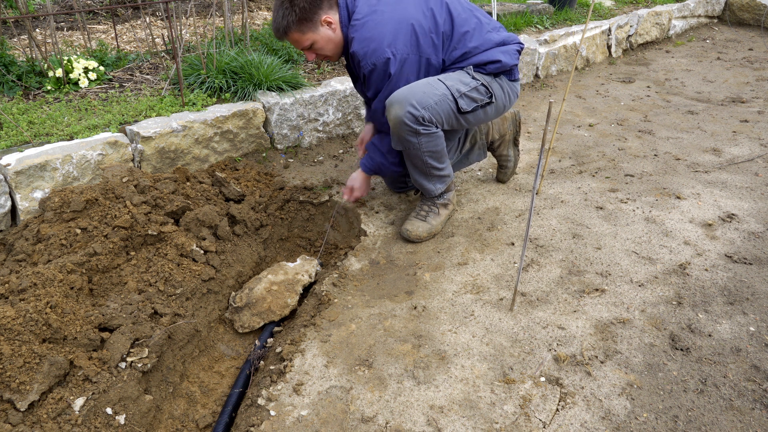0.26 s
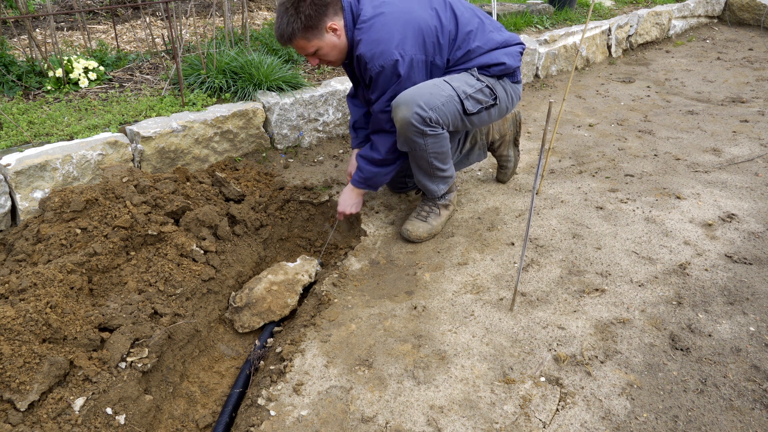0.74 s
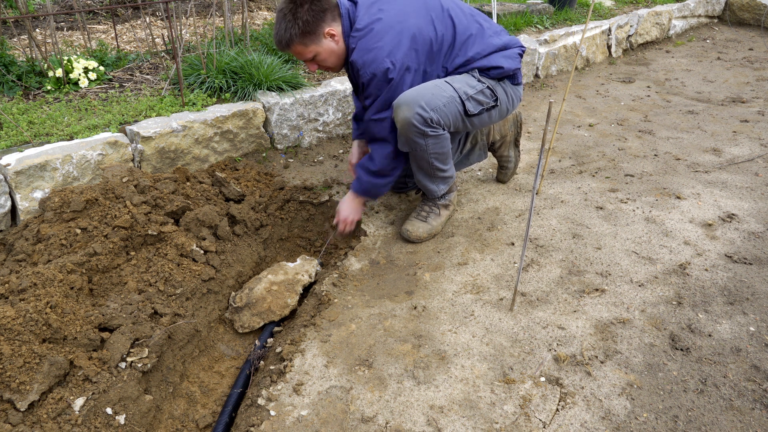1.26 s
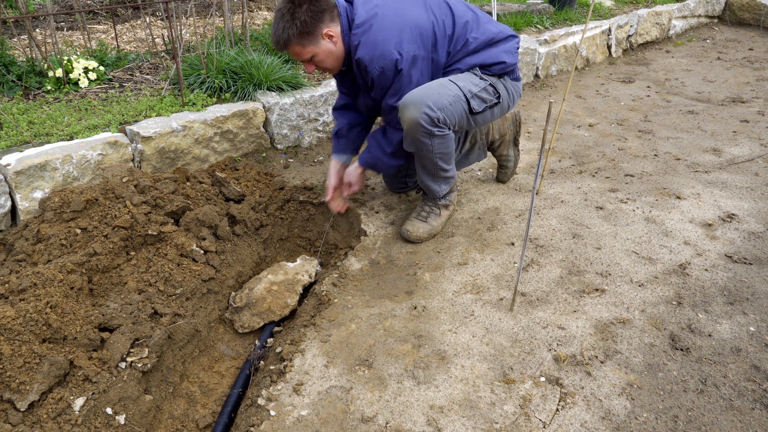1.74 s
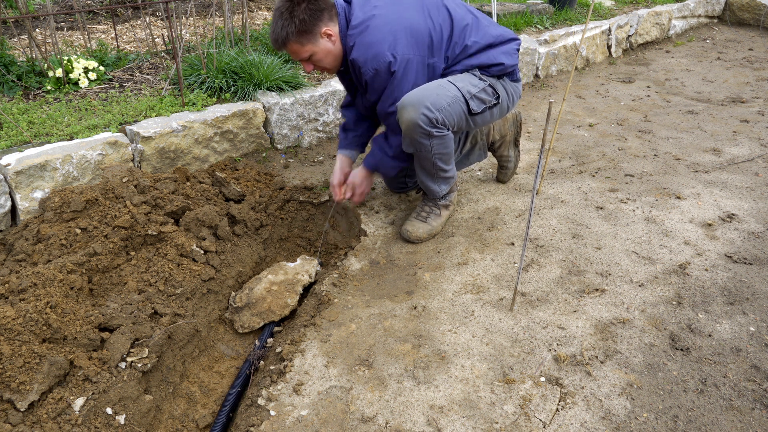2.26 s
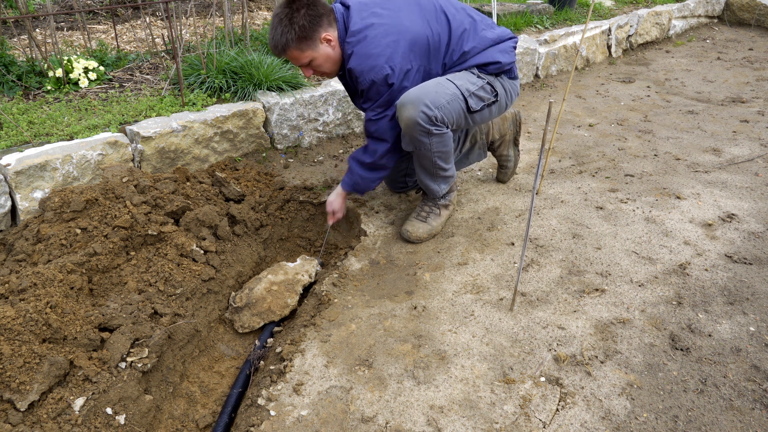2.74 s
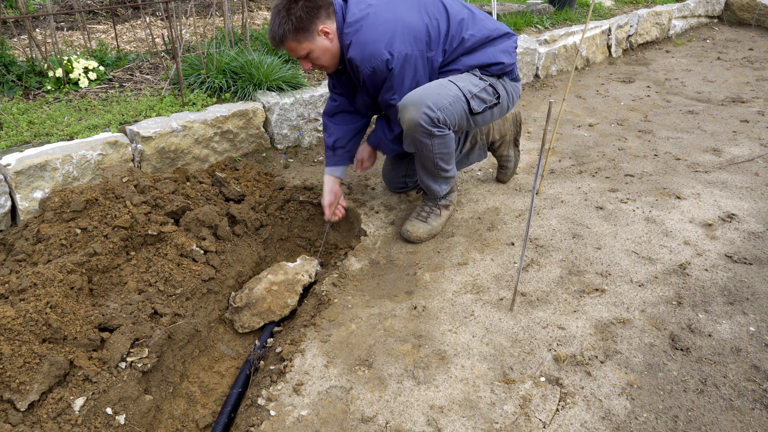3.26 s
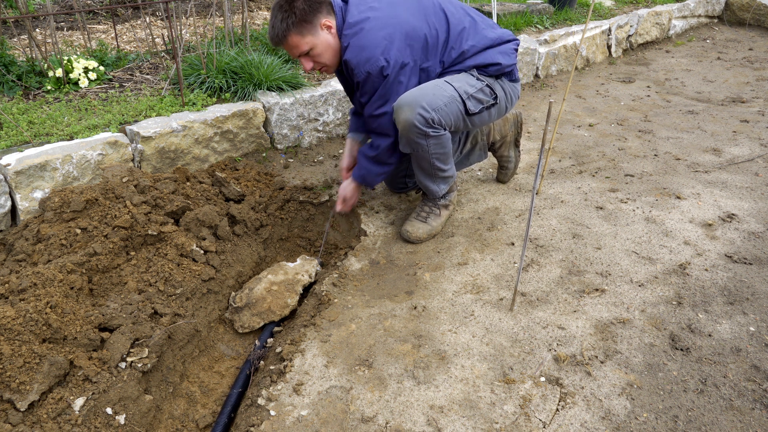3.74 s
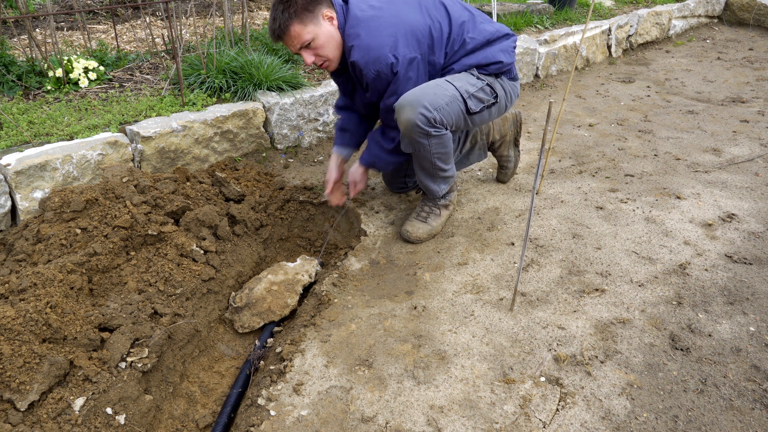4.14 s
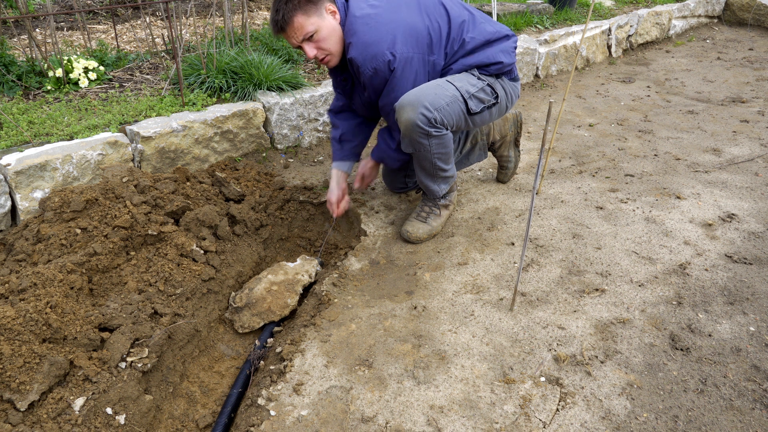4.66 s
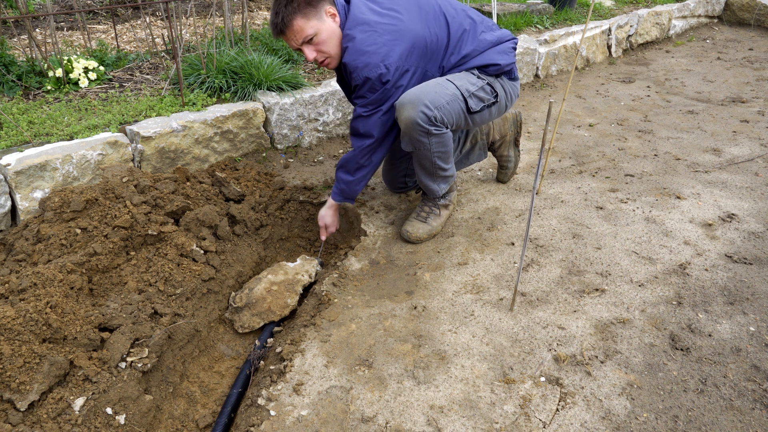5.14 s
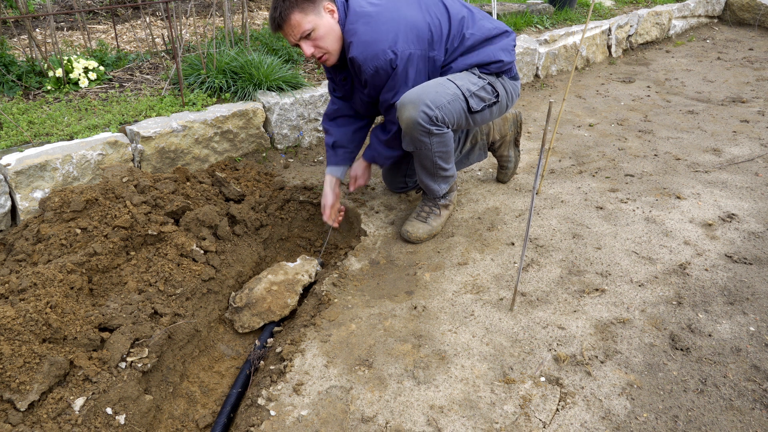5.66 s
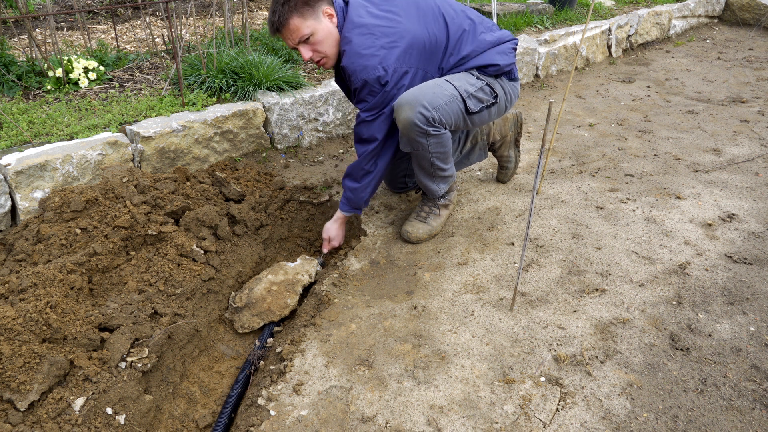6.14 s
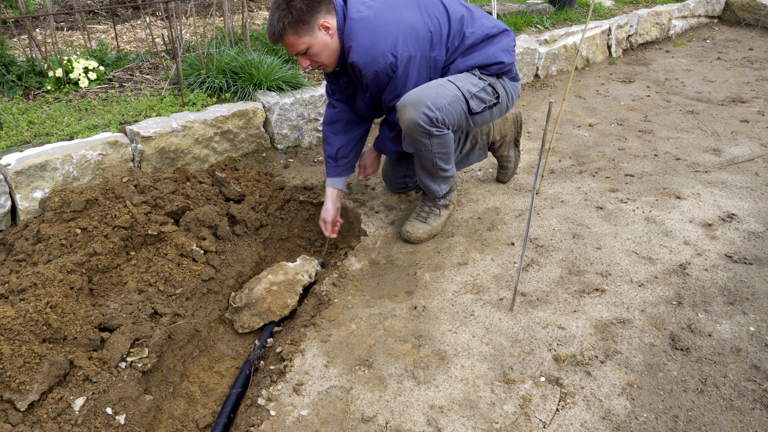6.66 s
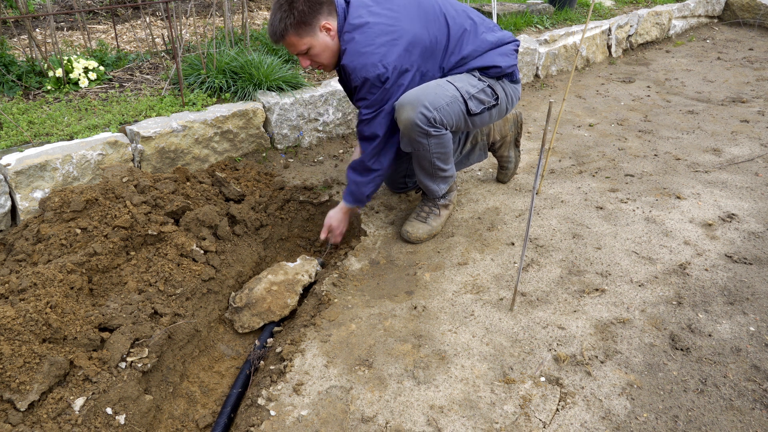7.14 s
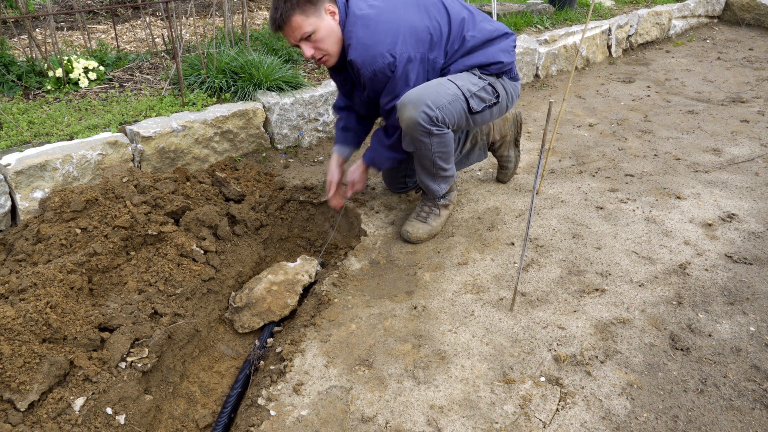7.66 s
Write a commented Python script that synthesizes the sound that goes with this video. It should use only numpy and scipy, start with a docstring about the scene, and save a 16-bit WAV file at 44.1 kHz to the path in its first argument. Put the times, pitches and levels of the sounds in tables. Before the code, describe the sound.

Dry, close outdoor sound of a stiff wire being pushed by hand into a ribbed plastic pipe in the ground. A faint scrape and tick open it; at 0.2 s a buzzing stroke swells to about 0.55 s. A very quiet nylon sleeve zip rises and falls around 0.6 s over a near pause. From 0.86 s strokes return, clicking regularly over ribs, the one to 1.65 s growing louder. By 2.3 s more of the wire rubs and the buzz becomes a dense, hollow rasp. Strokes then follow roughly every 0.4 s, swelling and dropping, with brief harder catches. Dull slaps knock the pipe near 2.7, 3.9, 4.1, 5.3, 7.6 and 7.8 s; sharp clicks at 0.3, 0.9, 4.9 and 7.1 s. A short lull comes near 6.2 s, then strong strokes peak near 6.9 and 7.35 s, and the last ends around 7.9 s. Low wind buffeting is mostly between 0.8 and 4 s, over faint garden air.

```python
"""A buzzing scrape comes in strokes: a stiff wire is fed by hand into a ribbed plastic pipe buried in a garden.
Its tip clicks over the ribs; within 2.34 s more bends rub the wall too and the buzz thickens to a rasp.
Filtered noise bursts knock on the pipe, filtered clicks snap off the ribs, and a nylon sleeve zips once
as a pair of gliding tones. Shaped noise makes the light wind on the microphone and the faint garden air."""
import sys
import numpy as np
from scipy import signal
from scipy.fft import rfft, irfft, next_fast_len
from scipy.io import wavfile
from scipy.ndimage import uniform_filter1d, map_coordinates

SR = 44100
rng = np.random.default_rng(int(sys.argv[2]) if len(sys.argv) > 2 else 0)


def generate_wav(signal):
    """Clip the signal to [-1, 1] and save it as 16-bit WAV at the path in sys.argv[1]."""
    frames = np.transpose(np.atleast_2d(signal))
    scaled = np.clip(frames, -1, 1) * 32767
    pcm = np.round(scaled).astype(np.int16)
    wavfile.write(sys.argv[1], SR, pcm)


N = 347949
TIME = np.arange(N) / SR
SIZE = 2 * next_fast_len(N // 2 + 8192)  # transform length, with room for filter tails
HZ = np.maximum(np.arange(SIZE // 2 + 1) * SR / SIZE, 1)

# colour of a rib contact: pitch_hz, relative density_db (per Hz)
CONTACT = [(120, -33.5), (220, -29), (320, -17), (400, -16.5), (500, -9), (700, -7.5), (950, -4.5),
           (1700, -6.5), (2250, -9), (3200, -3.5), (6300, -14.5), (8800, -17.5), (10800, -24.5),
           (15800, -31)]
# resonances of the pipe's bore and wall: pitch_hz, width_hz, lift_db
PIPE = [(1420, 470, 5), (2728, 434, 9.5), (4820, 2400, 5), (7690, 2100, 11), (13440, 3100, 12)]


def from_db(db):
    """Decibels to gain."""
    return 10 ** (np.asarray(db) / 20)


def rms_one(x):
    """Scale to unit power."""
    return x / np.sqrt(np.mean(x ** 2) + 1e-20)


def in_time(rows):
    """Join each column of a table with straight lines over its times."""
    times, *columns = np.transpose(rows)
    return [np.interp(TIME, times, column) for column in columns]


def slope_db(points):
    """A spectrum joined on a log-frequency axis."""
    hz, db = np.transpose(points)
    return np.interp(np.log(HZ), np.log(hz), db)


def bells_db(peaks):
    """Summed lift of a set of resonances; a negative lift is a dip."""
    return sum(db / (1 + (2 * (HZ - hz) / width) ** 2) for hz, width, db in peaks)


def colour(x, curve_db):
    """Causal, minimum-phase filter with the given response, built by folding its cepstrum."""
    cepstrum = irfft(np.log(from_db(curve_db)))
    cepstrum[1:SIZE // 2] *= 2
    cepstrum[SIZE // 2 + 1:] = 0
    response = np.exp(rfft(cepstrum))
    return irfft(rfft(x, SIZE) * response)[:N]


def split(x, edge_hz):
    """The parts below and above a frequency; they add up to the whole."""
    lowpass = signal.butter(4, edge_hz, fs=SR, output="sos")
    low = signal.sosfiltfilt(lowpass, x)
    return low, x - low


def drift(rate):
    """Random wander with spread 1: `rate` chance values a second, joined by straight lines."""
    knots = rng.standard_normal(4096)
    return rms_one(map_coordinates(knots, [TIME * rate], order=1, mode="wrap"))


def even(x):
    """Hold the slow level near 1 and keep the grain."""
    power = uniform_filter1d(uniform_filter1d(x ** 2, size=1600), size=1600)
    return x / np.sqrt(np.maximum(power, 1e-12))


def burst(t60):
    """A dense cluster of reflections, 60 dB down after t60 seconds, with unit energy."""
    t = np.arange(4096) / SR
    tail = rng.standard_normal(len(t)) * from_db(-60 * t / t60)
    return tail / np.sqrt(np.sum(tail ** 2))


def through_pipe(clicks, echo_db, t60):
    """Each click is followed by its reflections in the bore."""
    return clicks + from_db(echo_db) * signal.oaconvolve(clicks, burst(t60))[:N]


def resonate(x, hz, width_hz):
    """What one two-pole resonance passes, with gain about 1 at its top."""
    r = np.exp(-np.pi * width_hz / SR)
    feed = np.array([1, 0, -1]) * (1 - r * r) / 2
    feedback = [1, -2 * r * np.cos(2 * np.pi * hz / SR), r * r]
    return signal.lfilter(feed, feedback, x)


def scrape():
    """Tip and bends skip over the ribs, ring the pipe, and follow the push of the hand."""
    # with the tip near the mouth the gaps between resonances are deeper: pitch_hz, width_hz, lift_db
    near_mouth = [(2200, 2600, -4.5), (3530, 860, -4), (6470, 830, -8.5), (10500, 1900, -8),
                  (8460, 1000, 2.5)]
    level_db, weight_db, bite_db = hand()
    depth = np.clip(TIME / 2.34, 0, 1)  # share of the bends that already touch the wall
    ribs_per_s = 245 * from_db(.42 * np.clip(level_db + 23, -25, 3))  # faster is louder
    contact = rib_contact(ribs_per_s, level_db, depth)

    deep = colour(contact, slope_db(CONTACT) + bells_db(PIPE))
    shallow = colour(deep, bells_db(near_mouth))
    pipe = shallow + depth ** 2 * (deep - shallow)
    pipe = wandering_bore(free_spans(wire_modes(pipe)))

    wall, rest = split(pipe, 800)
    rasp, edge = split(rest, 2200)
    body = from_db(weight_db) * even(wall) + even(rasp)
    edge = from_db(bite_db) * even(flickering_treble(edge))
    # the wire whips in the bore, so the pressure flutters
    pressure_db = 0.73 * drift(55)
    return from_db(level_db + pressure_db) * (body + edge)


def rib_contact(ribs_per_s, level_db, depth):
    """The tip's regular clicks give way to the looser clicks of five bends, over rubbing noise."""
    creep_db = np.clip(level_db + 26.5, -12, 0)  # a creeping tip stays in touch and hardly skips
    tip_clicks = rib_clicks(ribs_per_s, jitter=.06, uneven_db=2.0)
    tip = even(through_pipe(tip_clicks, echo_db=-2.5, t60=0.012))
    bends = np.zeros(N)
    for _ in range(5):
        bend_clicks = rib_clicks(ribs_per_s * rng.uniform(.7, 1.2), jitter=.35, uneven_db=2.0)
        bends += through_pipe(bend_clicks, echo_db=2.5, t60=0.028)
    friction = rng.standard_normal(N) * from_db(2.9 * drift(260))
    tip_gain = from_db(creep_db - 9.0 * depth)
    bends_gain = from_db(-7 * (1 - depth))
    return tip_gain * tip + bends_gain * even(bends) + from_db(-3.5) * friction


def rib_clicks(per_s, jitter, uneven_db):
    """One click of uneven strength for each rib that a point of the wire passes."""
    speed = per_s * np.exp(jitter * drift(120))
    ribs_passed = np.floor(np.cumsum(speed) / SR + rng.random())
    strength_db = uneven_db * np.clip(rng.standard_normal(N), -2.2, 2.2)
    return np.diff(ribs_passed, prepend=ribs_passed[0]) * from_db(strength_db)


def wire_modes(x, relative_width=0.14, bore_hz=2800, bore_width_hz=440):
    """Through each push two bending modes of the wire are lifted or dipped, and so is the bore's ring."""
    # each new grip leaves the wire bent differently:
    # start_s, low_mode_hz, low_lift_db, high_mode_hz, high_lift_db, bore_lift_db
    grips = [(0, 1430, 7, 3080, 11, -2), (.19, 1160, 1.5, 2190, 6.5, 0), (.55, 1180, 0, 2380, 4, -5),
             (.85, 1068, 5.5, 4900, -2, -5), (1.18, 1386, 6.5, 3350, 2, 0.5),
             (1.65, 2026, 1.5, 3493, 4, 1.5), (2.08, 2041, 2, 3950, 6.5, 2), (2.49, 596.4, 6.5, 2069, 2, 2),
             (2.88, 2027, 1.5, 3870, 4.5, -0.5), (3.26, 1816, 5, 4025, 2.5, -2),
             (3.64, 589, 0, 3868, 2.5, 3), (4.03, 655.5, -1, 1970, 2, -2),
             (4.44, 591.2, 4, 1948, -0.5, -1.5), (4.82, 871, 3.5, 1082, 4.5, -0.5),
             (5.23, 580.3, 3, 3110, -3.5, 3.5), (5.63, 728, -3, 3059, -1.5, 2.5),
             (6.21, 918.6, -0.5, 3200, 1, -2.5), (6.68, 714, 2.5, 1099, 3.5, 0),
             (7.1, 1180, 4.5, 5127, 2.5, 0.5), (7.55, 650.4, 0, 4994, 2.5, -1.5)]
    out = x.copy()
    starts = [max(round(row[0] * SR), 0) for row in grips]
    ends = starts[1:] + [N]
    for start, end, (_, low_hz, low_db, high_hz, high_db, bore_db) in zip(starts, ends, grips):
        modes = ((low_hz, relative_width * low_hz, low_db),
                 (high_hz, relative_width * high_hz, high_db),
                 (bore_hz, bore_width_hz, bore_db))
        for hz, width_hz, lift_db in modes:
            out[start:end] += (from_db(lift_db) - 1) * resonate(x[start:end], hz, width_hz)
    return out


def free_spans(x, swing_db=3.5, rate=14, relative_width=0.023, count=30):
    """Spans of wire between contacts keep changing length, so narrow rings come and go."""
    out = x.copy()
    for hz in np.geomspace(450, 3400, count):
        lift_db = swing_db * (np.clip(drift(rate), -2, 2) - 0.14)
        out += (from_db(lift_db) - 1) * resonate(x, hz, relative_width * hz)
    return out


def wandering_bore(x, low_hz=2670, high_hz=2990, width_hz=260, swing_db=2.0):
    """As the contacts travel they favour one side of the bore's ring, then the other."""
    lean_db = swing_db * drift(28)
    low_side = (from_db(lean_db) - 1) * resonate(x, low_hz, width_hz)
    high_side = (from_db(-lean_db) - 1) * resonate(x, high_hz, width_hz)
    return x + low_side + high_side


def flickering_treble(edge):
    """Three bands of the treble flicker in level independently."""
    ring, top = split(edge, 3250)
    hiss, sizzle = split(top, 9500)
    top = hiss * from_db(1.0 * drift(22)) + sizzle * from_db(1.2 * drift(45))
    return ring * from_db(1.3 * drift(75)) + top


def hand():
    """Pushes swell and stop over a steady creep of the wire; gives level, wall weight and edge bite in dB."""
    # one push each, levels before trims and unsteadiness: start_s, end_s, attack_s, release_s, crest_db,
    # crest_s, sag_db_per_s (either side of the crest), creep_db, weight_db (wall), bite_db (edge)
    pushes = [(-0.0, 0.178, 0.0098, 0.038, -35, 0.24, 22, -50, -10.5, -0.5),
              (0.195, 0.547, 0.09, 0.084, -22.5, 0.28, 30, -52, -9.5, -3.5),
              (0.566, 0.834, 0.03, 0.19, -41.0, 0.58, 56, -50, -11.5, -5.1),
              (0.86, 1.168, 0.098, 0.062, -25.5, 0.96, 36, -67, -14.5, -3.9),
              (1.184, 1.658, 0.033, 0.071, -22.5, 1.5, 20, -37, -12.5, -3.5),
              (1.681, 2.093, 0.065, 0.13, -26.5, 1.94, 0, -37, -14, 1.3),
              (2.101, 2.492, 0.041, 0.057, -23.5, 2.23, 13, -44, -12.5, 1),
              (2.495, 2.882, 0.063, 0.049, -22, 2.68, 21, -32, -12.5, 0),
              (2.882, 3.267, 0.053, 0.083, -24, 3.07, 10, -38, -12, 2.5),
              (3.28, 3.643, 0.041, 0.088, -26.5, 3.42, 2, -42, -11.5, 4),
              (3.655, 4.036, 0.049, 0.044, -25.0, 3.91, 11, -46, -13.5, 3.5),
              (4.016, 4.432, 0.11, 0.08, -21.5, 4.2, 33, -35, -12.5, 2.7),
              (4.476, 4.83, 0.031, 0.065, -24, 4.62, 17, -49, -14.5, 1.5),
              (4.807, 5.237, 0.109, 0.055, -23.5, 5.06, 12, -43, -9.5, 0.2),
              (5.219, 5.654, 0.06, 0.076, -25, 5.38, 9, -36, -9.2, 1.5),
              (5.642, 6.16, 0.027, 0.17, -23.5, 5.78, 34, -40, -11, 3),
              (6.264, 6.679, 0.084, 0.063, -26.5, 6.43, 8, -47, -13.5, 2.1),
              (6.68, 7.101, 0.1, 0.053, -21, 6.91, 34, -31, -14, 2.5),
              (7.108, 7.521, 0.038, 0.18, -21.5, 7.35, 23, -51, -12.8, -0.2),
              (7.572, 7.923, 0.071, 0.051, -24.5, 7.71, 20, -35, -13, 2.5)]
    rasp_trim_db, wall_trim_db, edge_trim_db = -.5, -.5, -.5
    weight_per_db, bite_per_db = -0.47, 0.29  # away from the crest the sound is duller: dB per dB of level

    _, ends, _, _, crest_db, crest_s, _, creep_db, weight_db, bite_db = np.transpose(pushes)
    creep_changes_s = (ends[:-1] + ends[1:]) / 2
    power = from_db(creep_db[np.searchsorted(creep_changes_s, TIME)]) ** 2
    for start, end, attack, release, db, crest, sag, *_ in pushes:
        during = slice(*np.searchsorted(TIME, [start, end]))
        t = TIME[during]
        speed = np.clip(np.minimum((t - start) / attack, (end - t) / release), 0, 1)
        power[during] += (speed * from_db(db - sag * np.abs(t - crest))) ** 2
    push_db = 10 * np.log10(power) + stick_slip()
    from_crest_db = push_db - np.interp(TIME, crest_s, crest_db)

    catch_db, catch_weight_db = binding()
    tremor_db = 0.5651 * drift(25)
    effort_db = 0.57 * drift(12)  # slow unevenness of the arm
    wall_flutter_db = 1.74 * drift(46)
    level = push_db + rasp_trim_db + catch_db + tremor_db + effort_db
    weight = np.interp(TIME, crest_s, weight_db) + wall_trim_db + weight_per_db * from_crest_db
    weight = weight + catch_weight_db + wall_flutter_db
    bite = np.interp(TIME, crest_s, bite_db) + edge_trim_db + bite_per_db * from_crest_db
    return level, weight, bite


def stick_slip(surge_s=.018):
    """Sticking pulls the level down until the wire jerks free and overshoots; in dB."""
    # the jerks: jerk_s, dip_db before it, stick_s (growth time of the dip), surge_db after it
    jerks = [(.211, 4, .015, 5), (.929, 5, 0.024, 3), (1.207, 7, .012, 1), (1.746, 5, .02, 2.5),
             (2.121, 5, .015, 2), (2.516, 5, .012, 3), (4.836, 3, .012, 2), (5.257, 3, .015, 1.5),
             (6.238, 8, .05, .5)]
    change_db = np.zeros(N)
    for s, dip_db, stick_s, surge_db in jerks:
        distance_s = np.abs(TIME - s)
        sticking = -dip_db * np.exp(-distance_s / stick_s)
        surge = surge_db * np.exp(-distance_s / surge_s)
        change_db += np.where(TIME < s, sticking, surge)
    return change_db


def binding():
    """The wire binds for a moment and rasps harder: brief bumps in level and in wall weight, both in dB."""
    # the catches: centre_s, length_s, lift_db, added_weight_db
    catches = [(1.4, .02, 3, -1), (1.491, 0.039, 3, 2), (2.19, .04, 1, 3), (2.69, 0.031, 2, -3),
               (2.79, 0.042, 3, -4), (3.94, 0.024, 6, -2), (4.71, 0.059, .5, 7), (5.088, .025, 3.5, -3),
               (5.191, 0.042, .5, 5), (5.464, 0.019, 3, -5), (6.401, .04, 1, 6), (6.458, .03, 3, -1),
               (6.576, 0.041, 2.5, -4), (6.869, 0.061, 2, 2), (7.345, 0.046, 2.5, 1), (7.467, .02, 5, 2)]
    s, length, lift_db, weight_db = np.transpose(catches)
    bumps = np.exp(-(2 * (TIME[:, None] - s) / length) ** 2)
    return bumps @ lift_db, bumps @ weight_db


def knocks(level_db=21, ring_db=18):
    """The wire slaps the wall and chatters briefly; hard slaps also ring the upper resonances."""
    # wire slapping the wall: start_s, strength_db (relative), hardness_db (ring against slap)
    slaps = [(0.841, -14, -20), (0.928, -14, -19), (1.746, -12, -8.5), (2.122, -21, 4), (2.516, -18, -10),
             (2.674, -7, -15), (3.938, -2, -21), (4.074, -6, -14), (5.258, -6, -10), (5.38, -6, -14),
             (6.046, -11, -23), (6.196, -21, -32), (7.584, -3.5, -17), (7.617, -12, -4), (7.799, -3.5, -13)]
    # colour of a slap: pitch_hz, relative density_db (per Hz)
    slap_colour = [(150, -33), (350, -11), (600, -6), (1000, 4), (1450, -1.5), (2100, -22), (4000, -36),
                   (12000, -54)]
    dull, hard = np.zeros((2, N + 4096))
    for s, db, hard_db in slaps:
        hit = .85 * burst(.022)
        hit[0] += .5  # the first touch, before the chatter
        at = round(s * SR)
        dull[at:at + len(hit)] += hit * from_db(db)
        hard[at:at + len(hit)] += hit * from_db(db + hard_db)
    pipe = colour(hard[:N], slope_db(CONTACT) + bells_db(PIPE))
    _, ring = split(pipe, 2100)
    return from_db(level_db) * colour(dull[:N], slope_db(slap_colour)) + from_db(ring_db) * ring


def ticks():
    """The wire snaps off a rib: single sharp clicks with reflections, brighter than the sliding contacts."""
    # the snaps: start_s, strength_db (relative)
    snaps = [(0.061, -13), (0.2742, -6), (0.313, -10), (0.8899, -8), (0.9032, -29), (1.0193, -25),
             (3.2633, -22), (4.919, -5), (7.1013, -6), (7.4671, -21), (7.7997, -13)]
    clicks = np.zeros(N)
    for s, db in snaps:
        clicks[round(s * SR)] = from_db(db)
    bright_db = 1.4 * np.log2(HZ / 2000)  # 1.4 dB more per octave
    snapped = through_pipe(clicks, echo_db=3, t60=.01)
    return from_db(10) * colour(snapped, slope_db(CONTACT) + bright_db)


def sleeve(spread=0.03, waver=0.0069, level_db=-0.5):
    """Two patches of nylon weave zip past at slightly different speeds, as wavering sine tones."""
    # the sleeve rubbing: time_s, weave_hz (midway between the patches), level_db (before the trim)
    weave = [(.515, 2364, -72), (.535, 2743, -53), (.555, 3500, -47), (.571, 4080, -51), (.587, 4200, -50),
             (.605, 3900, -50), (.62, 3360, -45), (.637, 3080, -54), (.655, 2800, -76)]
    hz, db = in_time(weave)
    zips = np.zeros(N)
    for side in (-1, 1):
        pitch_hz = hz * (1 + side * spread + waver * drift(504))
        zips += np.sin(2 * np.pi * np.cumsum(pitch_hz) / SR)
    rubbing = (TIME > weave[0][0]) * (TIME < weave[-1][0])
    return zips * from_db(db + level_db) * rubbing


def outdoors(gust_db=4.5, gusts_per_s=5.4, garden_db=-51):
    """Faint garden air and gusty low buffeting of the microphone, both coloured noise."""
    # low buffeting, before the gusts: time_s, level_db
    wind_level = [(0.0, -52), (0.39, -56), (0.83, -36), (1.34, -48), (1.47, -38), (1.89, -47), (2.09, -40),
                  (2.13, -40), (2.46, -40.5), (3.73, -40.5), (4.44, -59), (6.13, -61), (7.21, -54.5),
                  (7.89, -54)]
    # colour of the buffeting: pitch_hz, relative density_db (per Hz)
    buffet_colour = [(8, -6), (16, 9), (32, -12), (50, -19), (100, -26), (300, -76)]
    # colour of the garden air: pitch_hz, relative density_db (per Hz)
    garden_colour = [(30, 1), (65, 1.5), (115, -2.5), (160, -3.5), (300, -4), (900, -8), (2500, -17),
                     (6000, -15.5), (15000, -25.5)]
    wind_db, = in_time(wind_level)
    buffet = rms_one(colour(rng.standard_normal(N), slope_db(buffet_colour)))
    wind = from_db(wind_db + gust_db * drift(gusts_per_s)) * buffet
    air = rms_one(colour(rng.standard_normal(N), slope_db(garden_colour)))
    return wind + from_db(garden_db) * air


def scene():
    """All sources at one microphone in the open."""
    return (scrape() + knocks() + ticks() + sleeve() + outdoors())[None]


def record(dry, cutoff_hz=15850):
    """The top is cut steeply by an elliptic low-pass."""
    lowpass = signal.ellip(12, .1, 80, cutoff_hz, fs=SR, output="sos")
    return signal.sosfilt(lowpass, dry)


dry = scene()
out = record(dry)
generate_wav(out)
```